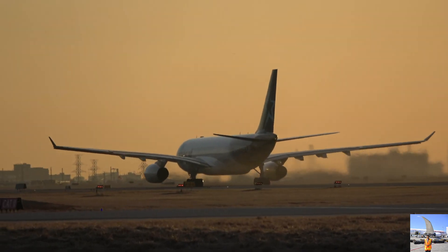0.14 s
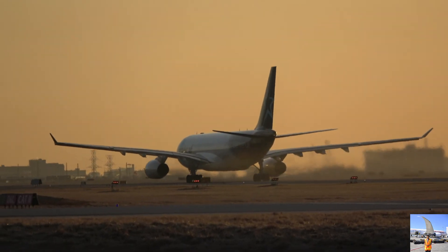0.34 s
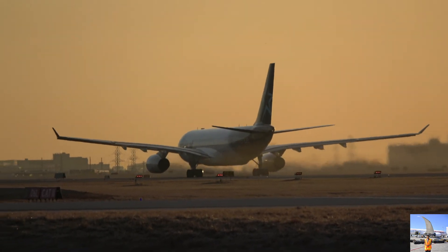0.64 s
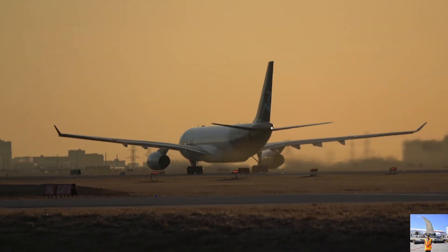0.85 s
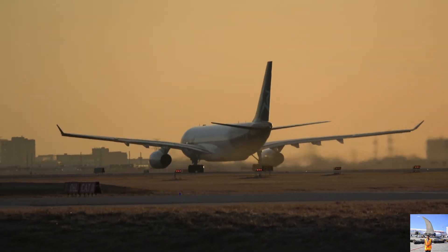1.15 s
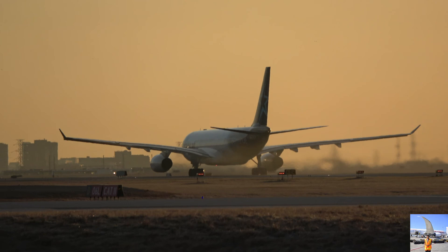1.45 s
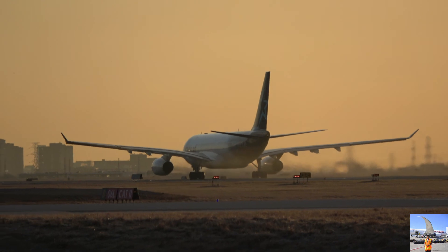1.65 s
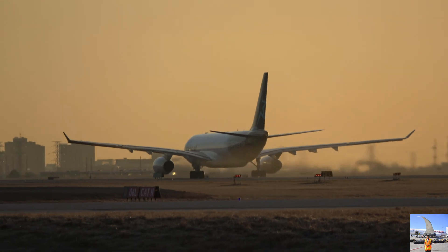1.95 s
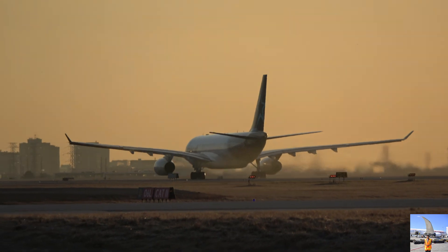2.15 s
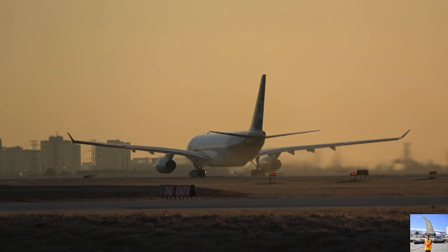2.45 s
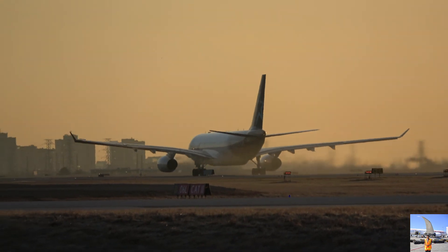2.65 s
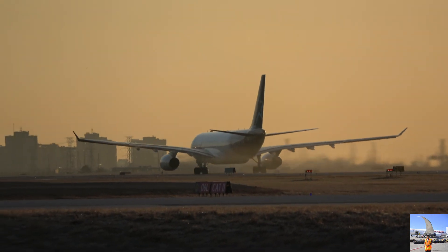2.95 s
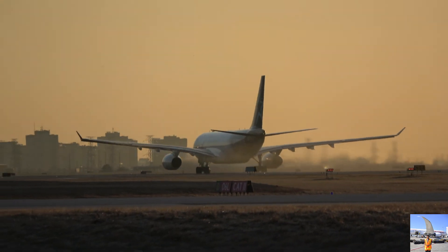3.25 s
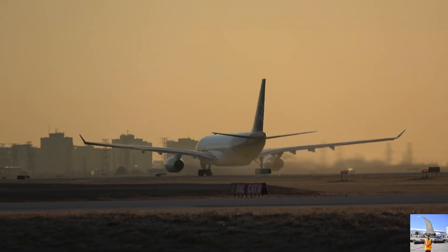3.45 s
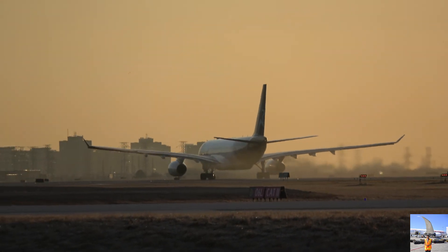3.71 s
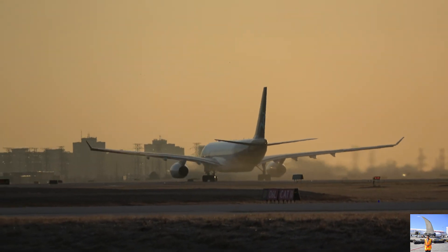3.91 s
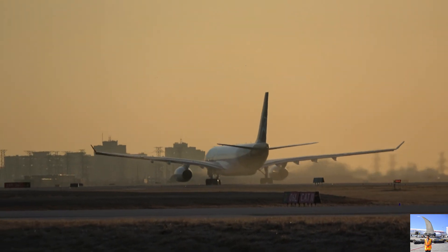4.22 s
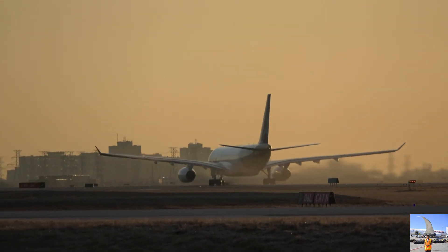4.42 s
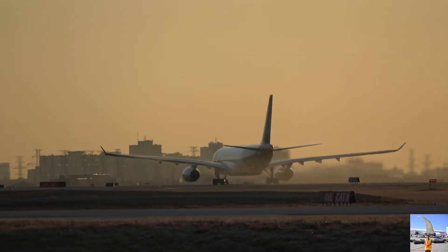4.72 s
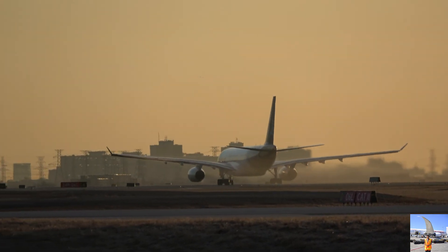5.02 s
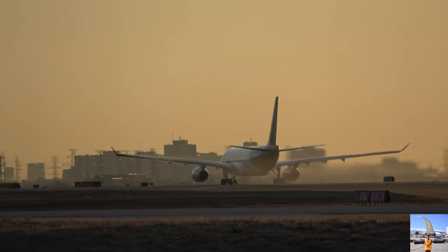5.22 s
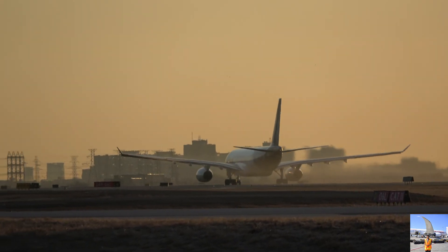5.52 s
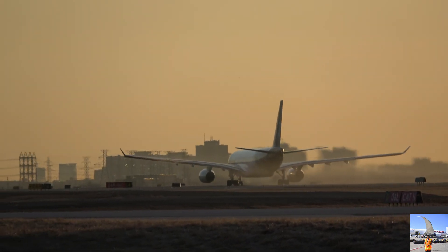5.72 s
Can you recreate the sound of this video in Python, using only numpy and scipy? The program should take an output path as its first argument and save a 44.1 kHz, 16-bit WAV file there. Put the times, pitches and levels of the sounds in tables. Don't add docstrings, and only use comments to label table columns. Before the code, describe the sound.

From open ground beside a runway, an airliner rolls away at full power. Massive low rumble surges unevenly beneath a broad, rough roar with fluttering treble. A faint rising turbine whistle disappears within the first second and a low shaft hum soon after. The roar swells strongest near two seconds, then the treble dulls. A small bird squeaks briefly on the left. Distant stereo pair, rumble leaning left, upper roar right.

```python
import sys
import numpy as np
from scipy import signal
from scipy.fft import rfft, irfft
from scipy.io import wavfile
from scipy.ndimage import uniform_filter1d

SR = 44100
rng = np.random.default_rng(int(sys.argv[2]) if len(sys.argv) > 2 else 0)


def makeup_ratio(level_db):
    decades = np.asarray(level_db, float) / 20
    return 10 ** decades


def store_pcm(level_fs):
    pcm = np.round(np.clip(level_fs, -1, 1) * 32767).astype(np.int16)
    wavfile.write(sys.argv[1], SR, np.atleast_2d(pcm).T)


N = 258866
SIZE, HOP = 2048, 512

# f/Hz, density/dB
RUMBLE_SPECTRUM = [(5, -50.5), (20, -10), (50, -6), (80, 3.5), (112, -8.5), (124, -19), (160, -4.5),
                   (200, -22), (280, -51), (500, -120)]
ROAR_SPECTRUM = [(60, -100), (130, -20.5), (200, 1.5), (330, -1), (660, -1.5), (1000, -5.5), (1400, -14),
                 (1900, -24.5), (2800, -57), (5000, -120)]
RASP_SPECTRUM = [(400, -100), (900, -19), (1400, 2), (1900, -2.5), (2600, -10.5), (3200, -16.5),
                 (4000, -23.5), (5500, -36.5), (9000, -120)]
HISS_SPECTRUM = [(1200, -100), (2600, -4), (3800, -2.5), (5000, -4.5), (6400, -5), (8000, -14),
                 (11000, -18), (13500, -25), (15200, -34.5), (20000, -117)]
# level/dB, loss with distance/(dB/s), loss as the nozzles turn/dB, share of the air/1
EDDIES = [
    (-12.5, 0.39, 0, 0),
    (-23.5, 0.02, 0, 0),
    (-33.5, -0.01, 2, 0.95),
    (-49, 0.15, 7, .6),
]
# t/s, half length/s, level/dB
RUMBLE_SURGES = [(.25, .2, -3), (.6, .12, 1), (1.0, 0.07, 0.5), (1.55, .2, 1.5), (2.2, .2, 1),
                 (2.63, 0.03, -6), (2.85, 0.092, 1.5), (3.8, 0.16, 2), (4.0, 0.033, 0.5),
                 (4.25, 0.043, 2.5), (5.0, .3, -1.5), (5.65, 0.098, 2.5)]
# t/s, half length/s, level/dB
ROAR_LOBES = [
    (2.055, 0.5, 3.6),
    (1.08, .5, 2),
    (3.9, 1.0, 1.9),
]
# f/Hz, share/1
ROAR_FOCUS = [(300, .1), (480, 1.2), (660, 2.73), (1000, 0.65), (1500, 0.94)]
# t/s, level/dB
AIR_CLEARNESS = [(0, 0.5), (.25, -0.5), (.6, 0), (1.1, 1), (1.5, -0.5), (1.9, -1), (2.25, -1), (2.6, -0.5),
                 (2.9, -0.5), (3.2, -.5), (3.6, 0.5), (4.0, 0), (4.4, -0.5), (4.9, .5), (5.25, 0), (5.6, 2),
                 (5.87, -1)]
# t/s, half length/s, f/Hz, half width/Hz, level/dB
AIR_LENSES = [(0.18, 0.5, 185, 19, 2.5), (.35, .4, 3200, 350, 3), (1.32, 0.45, 2510, 185, 7),
              (0.9, .9, 8000, 1100, 5), (2.9, 0.32, 650, 120, 4), (4.2, 1.1, 1092, 71, 5.5),
              (3.9, 1.5, 4800, 390, 5), (5.6, .25, 1900, 260, 4.5), (5.5, .25, 290, 44, 1),
              (2.05, 0.41, 1000, 200, 4), (2.85, .3, 1500, 300, -3.5), (4.7, .4, 1500, 250, -2.5),
              (4.8, 0.62, 230, 47, -1.5), (2.2, 0.16, 150, 54, -2.5), (5.4, 0.55, 890, 150, 2.5),
              (1.1, 0.25, 190, 27, 2.5), (3.7, .2, 6000, 800, 5)]
# t/s, level/dB, half width/s
AIR_CELLS = [
    (1.325, 2.5, 0.01),
    (1.83, -3, 0.045),
    (2.125, -12, 0.011),
]
# f/Hz, half width/Hz, level/dB
SOFT_GROUND = [
    (111.2, 9, 2.5),
    (128.6, 11, -6),
    (155, 13, .5),
    (180, 17, -2),
]
# f/Hz, left over right level/dB
PAIR_BALANCE = [(30, -0.5), (100, 6), (160, 0), (230, -1), (440, -5.5), (650, -4.5), (1200, -6),
                (2000, -10.5), (4500, -10), (6500, -14.5), (8500, -16.5), (14000, -9.5)]
# f/Hz, share/1
SWING_SHARE = [(300, 0.012), (1200, 0.45), (2000, 0.95), (3400, 0.87), (4500, .2)]
# t/s, left over right level/dB
MIC_SWING = [(0, -10.5), (1.35, -15), (2.1, -11), (3.2, -12.5), (4.6, -16.5), (4.9, -16.5), (5.87, -17.5)]
# f/Hz, coherence/1
PAIR_LIKENESS = [(40, .999), (170, .992), (700, .997), (3000, .992), (5000, .96), (6500, .78), (8500, .4),
                 (11000, .5), (14000, .4)]
# f/Hz, phase/rad
LEFT_LEAD = [(4500, 0), (6500, -.2), (8500, .3), (10000, 2.2), (14000, 1.9)]
# f/Hz, density/dB
SELF_NOISE_SPECTRUM = [(1500, -40), (4000, -4), (6000, 3), (9000, -3), (12000, -6.5), (15200, -7.5),
                       (19000, -59.5)]
# t/s, length/s, f/Hz, trill depth/Hz, level/dB
BIRD_NOTES = [
    (2.53, .055, 8600, 40, -74),
    (2.58, .055, 8670, 20, -69.5),
    (2.63, .075, 8650, 650, -74),
]


def evened(x):
    return x / np.sqrt(np.mean(abs(x) ** 2) + 1e-20)


def read(points, hz):
    f, value = np.transpose(points)
    return np.interp(np.log(hz + 1), np.log(f + 1), value)


def spectrum(points, hz):
    return evened(makeup_ratio(read(points, hz)))


def bell(x, centre, half):
    return np.exp(-((x - centre) / half) ** 2)


def bumps(rows, x):
    return sum(db * bell(x, centre, half) for centre, half, db in rows)


def sides(left_db, right_db):
    return makeup_ratio(np.array([[left_db], [right_db]]))


def pair(magnitude, balance_db, same, lead):
    a, b, c, d = rng.standard_normal((*magnitude.shape[::-1], 4)).T
    same = np.clip(same, -1, 1)
    right = a + 1j * b
    left = same * right * np.exp(1j * lead) + np.sqrt(1 - same ** 2) * (c + 1j * d)
    share = 2 / (1 + makeup_ratio(balance_db))
    frames = dict(nperseg=SIZE, noverlap=SIZE - HOP)
    white = signal.istft(np.array([left, right]), **frames)[1].std()
    z = np.array([left * share * makeup_ratio(balance_db), right * share]) * magnitude
    return signal.istft(z, **frames)[1][:, :N] / white


def self_noise():
    hz = np.fft.rfftfreq(SIZE, 1 / SR)[:, None] * np.ones(N // HOP + 5)
    return makeup_ratio(-69.5) * pair(spectrum(SELF_NOISE_SPECTRUM, hz), balance_db=0, same=0.6, lead=0)


def tone(hz, db, wander_hz, waver_db):
    noises = rng.standard_normal((2, N))
    drift, waver = (evened(signal.oaconvolve(v, np.hanning(1200), "same")) for v in noises)
    phase = 2 * np.pi * np.cumsum(hz + wander_hz * drift) / SR
    return np.sqrt(2) * makeup_ratio(db + waver_db * waver) * np.sin(phase)


def bird(t):
    trill_hz = 27
    hz, size = np.zeros(N), np.zeros(N) + 1e-9
    for start, length, note_hz, trill_depth_hz, db in BIRD_NOTES:
        since = t - start
        on = (t >= start) & (t < start + length)
        hz += on * (note_hz - trill_depth_hz * np.sin(2 * np.pi * trill_hz * since))
        size += on * makeup_ratio(db) * np.sqrt(abs(np.sin(np.pi * since / length)))
    return size * tone(hz, 0, wander_hz=50, waver_db=3.5)


def turned_away_db(t, gone_s):
    fade_s, fade_db = 0.35, 25
    return fade_db * (np.maximum(t - gone_s + fade_s / 2, 0) / fade_s) ** 2


def turbine(t):
    hz = 6250 + 135 * (t + t ** 2)
    db = -61 - turned_away_db(t, gone_s=0.8)
    return tone(np.minimum(hz, SR / 4), db, wander_hz=30, waver_db=2)


def shaft(t):
    sag_db = 4 * t
    return tone(134, -23 - sag_db - turned_away_db(t, gone_s=1.4), wander_hz=0.5, waver_db=2)


def burner(t):
    top_s, swell_db = 3.5, 8
    return tone(313, -34.5 - swell_db * abs(t / top_s - 1), wander_hz=4, waver_db=3)


def flutter(frames, bins, span_frames, span_bins):
    field = rng.standard_normal((frames, bins))
    field = uniform_filter1d(field, size=span_frames, axis=0)
    return evened(uniform_filter1d(field, size=span_bins, axis=1)).T


def eddy_levels_db(t, clear_db, turned):
    levels_db = [db - loss * t - shade * turned + share * clear_db for db, loss, shade, share in EDDIES]
    levels_db[0] = levels_db[0] + bumps(RUMBLE_SURGES, t)
    levels_db[1] = levels_db[1] + bumps(ROAR_LOBES, t)
    return levels_db


def mixing_noise(hz, levels_db, clear_db, turned):
    roar_db = levels_db[1]
    swell = makeup_ratio((read(ROAR_FOCUS, hz) - 1) * (roar_db - roar_db.mean()))
    reach = np.clip(1 + 0.05 * clear_db * turned, 0.7, 1.4)
    rumble = spectrum(RUMBLE_SPECTRUM, hz)
    roar = spectrum(ROAR_SPECTRUM, hz) * swell
    rasp = spectrum(RASP_SPECTRUM, hz / reach)
    hiss = spectrum(HISS_SPECTRUM, hz)
    power = sum((shape * makeup_ratio(db)) ** 2 for shape, db in zip((rumble, roar, rasp, hiss), levels_db))
    return np.sqrt(power)


def bounce_comb(hz, t):
    near, far, grow_s, delay_s = 0.22, 0.47, 1.6, 0.003096
    bounce = far + (near - far) * np.exp(-(t / grow_s) ** 2)
    echo = bounce * np.exp(-(hz / 1350) ** 2) * (hz > 150)
    return abs(1 + echo * np.exp(-2j * np.pi * hz * delay_s)) / np.sqrt(1 + echo ** 2)


def air_path_db(hz, t, hiss_db):
    treble = np.clip(np.log2(hz / 700 + 1e-9) / 3, 0, 1)
    patches_db = 0.52 * flutter(len(t), len(hz), span_frames=8, span_bins=24)
    gusts_db = 1.2 * treble * flutter(len(t), len(hz), span_frames=1, span_bins=300)
    cells_db = np.sqrt(treble) * sum(db * bell(t, s, half) for s, db, half in AIR_CELLS)
    lenses_db = sum(db * bell(t, s, half) * bell(hz, f, wide) for s, half, f, wide, db in AIR_LENSES)
    octaves_up = np.maximum(np.log2(hz / 7000 + 1e-9), 0)
    dulling_db = 0.93 * (hiss_db - hiss_db.max()) * octaves_up
    return patches_db + gusts_db + cells_db + lenses_db + dulling_db


def jet():
    hz = np.fft.rfftfreq(SIZE, 1 / SR)[:, None]
    t = np.arange(N // HOP + 5) * HOP / SR
    clear_db = np.interp(t, *np.transpose(AIR_CLEARNESS))
    swing_db = np.interp(t, *np.transpose(MIC_SWING))
    turned = 0.5 + 0.5 * np.tanh((t - 1.82) / 0.17)
    levels_db = eddy_levels_db(t, clear_db, turned)
    magnitude = mixing_noise(hz, levels_db, clear_db, turned) * bounce_comb(hz, t)
    magnitude = magnitude * makeup_ratio(air_path_db(hz, t, levels_db[3]))
    balance_db = read(PAIR_BALANCE, hz) + read(SWING_SHARE, hz) * (swing_db - swing_db.mean())
    return pair(magnitude, balance_db, read(PAIR_LIKENESS, hz), read(LEFT_LEAD, hz))


def ground(x):
    gain = makeup_ratio(bumps(SOFT_GROUND, np.fft.rfftfreq(N, 1 / SR)))
    return irfft(rfft(x, axis=1) * gain, N, axis=1)


def scene():
    t = np.arange(N) / SR
    mix = bird(t) * sides(3.5, -6.5)
    mix = mix + turbine(t) * sides(-6.5, 3.5)
    mix = mix + shaft(t) * sides(1.8, -2.3)
    mix = mix + burner(t) * sides(-1.5, 1.3)
    return mix + ground(jet())


def top_cut(x):
    return signal.sosfilt(signal.butter(12, 15140, fs=SR, output="sos"), x)


def record(dry):
    power = (dry ** 2).mean(0)
    for _ in range(2):
        power = uniform_filter1d(power, size=500)
    over_db = np.maximum(10 * np.log10(power + 1e-9) + 13, 0)
    held = (dry + self_noise()) * makeup_ratio(-0.4 * over_db)
    return top_cut(held)


dry = scene()
out = record(dry)
store_pcm(out)
```